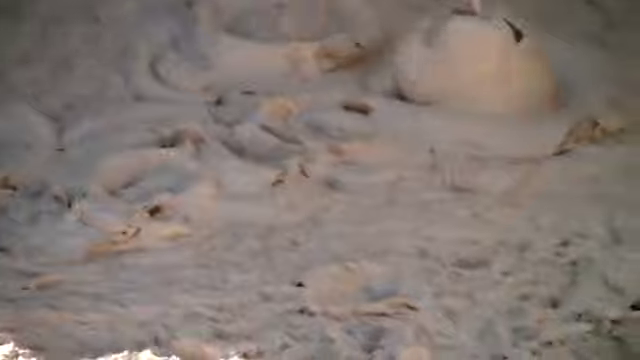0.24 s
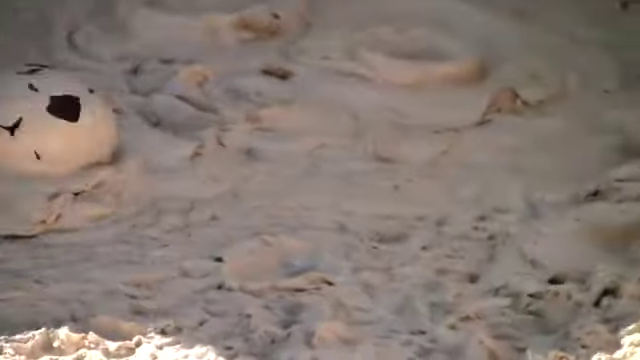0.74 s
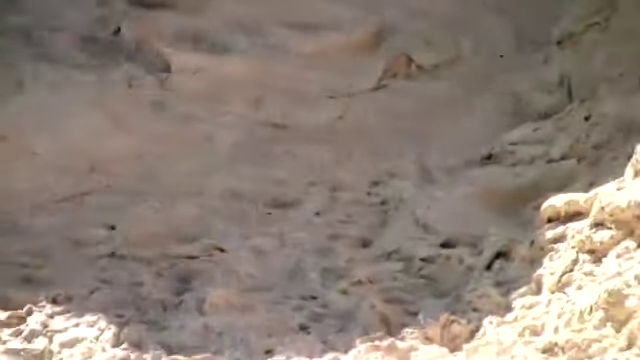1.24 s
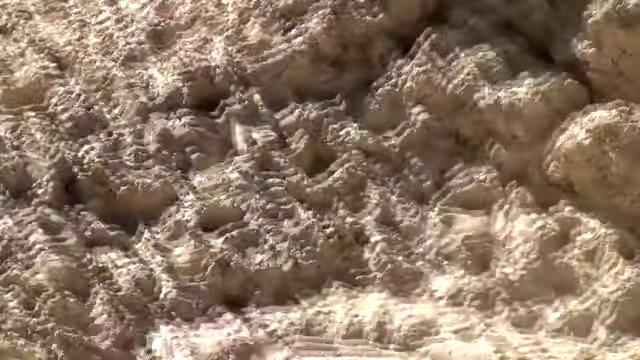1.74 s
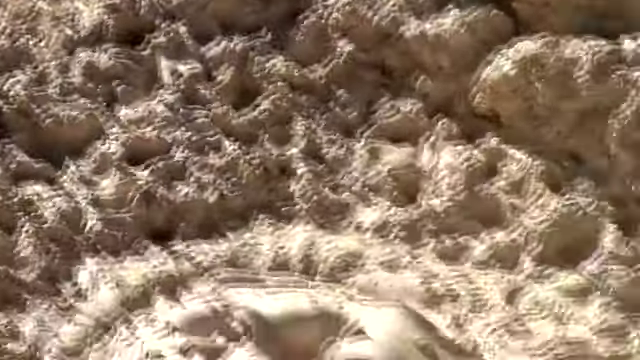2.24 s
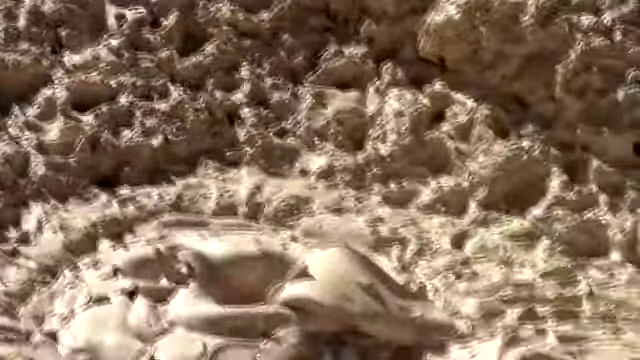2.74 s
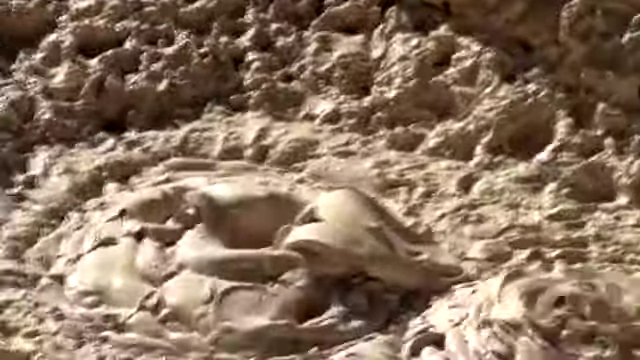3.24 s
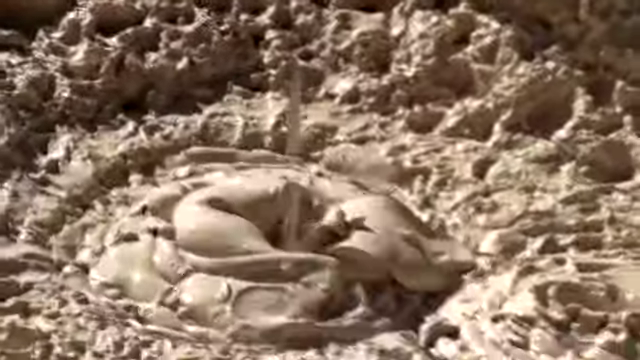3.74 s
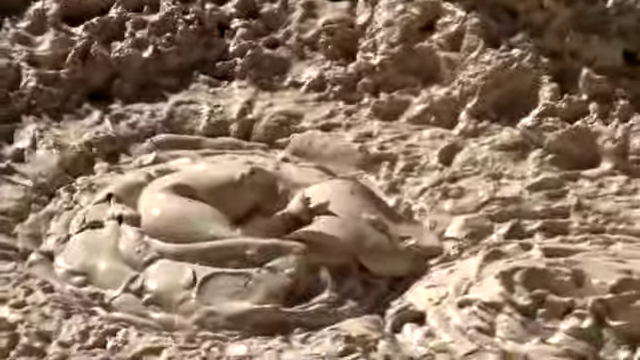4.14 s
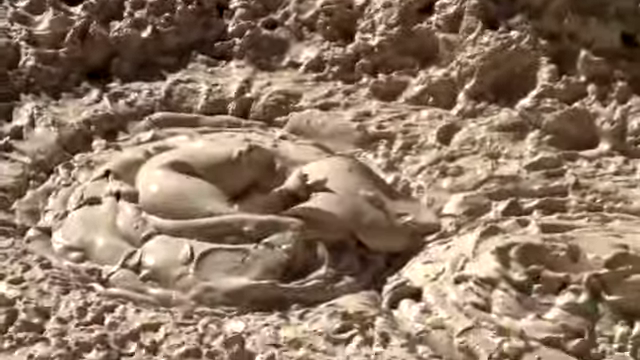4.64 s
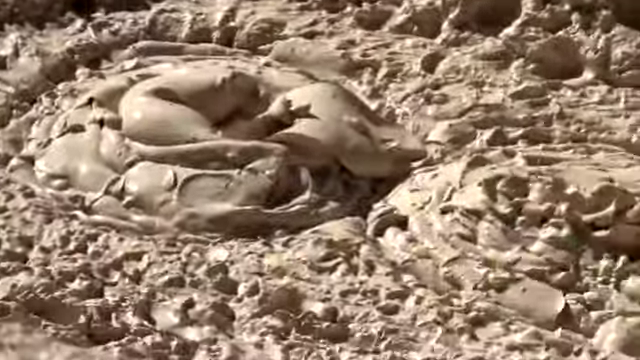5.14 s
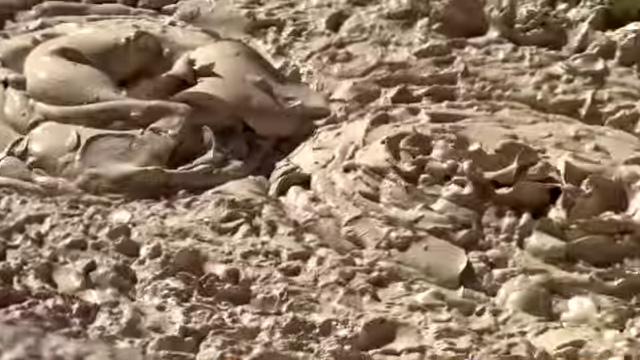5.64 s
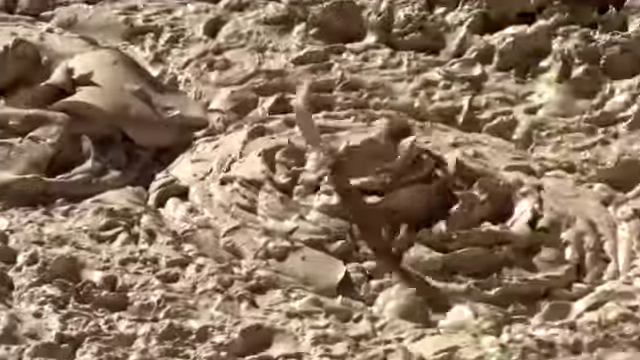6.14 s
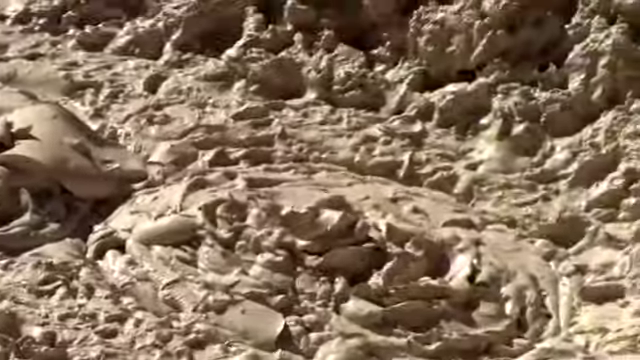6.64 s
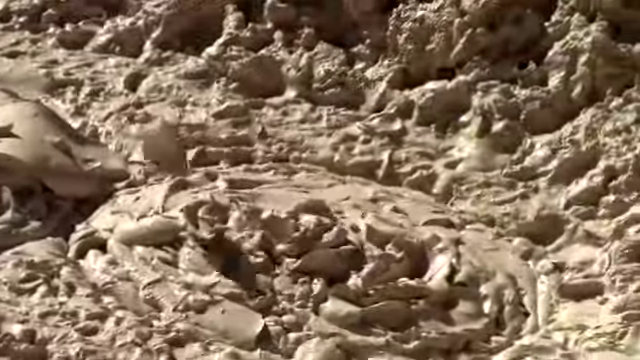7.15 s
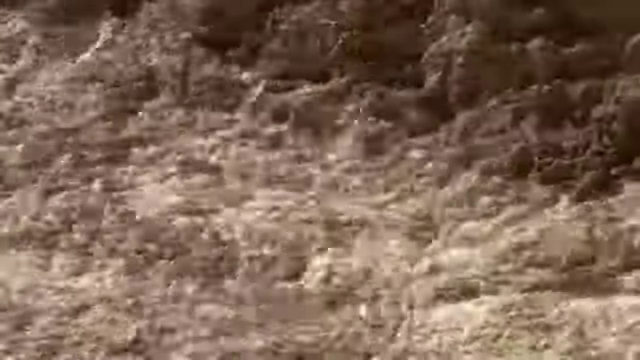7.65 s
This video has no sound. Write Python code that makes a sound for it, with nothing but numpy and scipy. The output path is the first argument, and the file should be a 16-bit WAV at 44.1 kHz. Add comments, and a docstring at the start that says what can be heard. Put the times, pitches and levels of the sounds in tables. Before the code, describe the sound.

A mud pot boils steadily, heard in stereo from its edge. Mid-low glugs and blunt pops come several per second, some single, some tumbling together, with occasional higher blips. Sticky slaps, crackly ticks and faint spits of steam accompany them, while heavy mud sloshes low. Between bursts only a quiet, soft simmering wash remains. Outdoors, close, with tight short reflections from the pit.

```python
"""Gas bubbles swell and burst in a pit of thick hot mud, heard in stereo from the rim. Each cavity rings for a
few gliding cycles, a swelling sine wave; where the skin breaks, it slaps and snaps. Steam is noise that hisses
out of the torn skin; froth (many tiny cavities) and slosh follow the churning. Farther pots simmer under it all
as a soft wash of noise, an even hiss lies over the treble, and the pit walls give the bursts a short echo."""
import sys
import numpy as np
from scipy import signal
from scipy.fft import rfft, irfft
from scipy.io import wavfile
from scipy.ndimage import uniform_filter1d

SR = 44100
rng = np.random.default_rng(int(sys.argv[2]) if len(sys.argv) > 2 else 0)


def to_wav(sig):
    """Store sig (one row per channel, or 1-D mono) as 16-bit WAV at the path in sys.argv[1].

    Samples outside -1..1 are clipped; the rate is SR.
    """
    pcm = np.clip(np.atleast_2d(sig), -1, 1) * 32767
    pcm = np.round(pcm).astype(np.int16)
    wavfile.write(sys.argv[1], SR, pcm.T)  # frames by channels


N = 348390  # length in samples


def gain_of(db):
    """Turns decibels into a factor for the wave."""
    return 10 ** (np.asarray(db) / 20)


def evened(x):
    """Brings a sound to an average (RMS) strength of 1."""
    return x / np.sqrt(np.mean(x ** 2) + 1e-20)


def read(points, hz):
    """Reads a curve between its points, with frequency on a log scale as in hearing."""
    f, value = np.transpose(points)
    return np.interp(np.log(hz + 1), np.log(f + 1), value)


def add(mix, start_s, sound):
    """Lays a sound into the mix at its start time."""
    part = mix[max(round(start_s * SR), 0):][:len(sound)]
    part += sound[:len(part)]


def shaped(x, points):
    """Colours a sound by a spectrum in dB."""
    hz = np.fft.rfftfreq(N, 1 / SR)
    return irfft(rfft(x) * gain_of(read(points, hz)), N)


def filtered(x, order, hz, kind):
    """Keeps the part of a sound above, below or between the given frequencies."""
    return signal.sosfilt(signal.butter(order, hz, kind, fs=SR, output="sos"), x)


def cavity(hz, rise_s, glide, phase, quiver=(0, 0)):
    """A gas cavity swells and dies in a few cycles; its pitch glides as it opens and wavers as the walls quiver."""
    t = np.arange(round(7 * abs(rise_s) * SR) + 2) / SR
    u = t / abs(rise_s)  # time counted in rise times: loudest at 1
    phase = phase + np.interp(t / .007, np.arange(len(quiver)), np.cumsum(quiver))  # a new nudge every 7 ms
    swell = (u * np.exp(1 - u)) ** 1.39
    turns = hz * t * (1 + glide * (u / 2 - 1)) + phase  # passes through hz at the loudest moment
    return swell * np.sin(2 * np.pi * turns)


# The large bubbles. Each row: start in seconds, pitch in Hz, relative peak level in dB, rise time in ms.
LARGE_BUBBLES = [(.0044, 312, -29, 13.3), (0.046, 238, -15.5, 4), (.0697, 652, -29, 21.7),
                 (.088, 615, -19, 2), (0.1037, 590, -8.5, 2.3), (.288, 267, -16.5, 3.3),
                 (.336, 1343, -14, 6.5), (.3468, 502, -13.5, 6.6), (0.362, 550, -6.5, 2),
                 (.514, 513, -30, 31), (0.5511, 603, -11, 2), (.5635, 670, -6.5, 1.46),
                 (0.8475, 272, -13.5, 6.5), (.9056, 480, -15.5, 6.7), (0.9081, 1535, -18.5, 2.5),
                 (0.9686, 510, -8.5, 2.6), (0.9866, 313, -14, 7.5), (.9883, 520, -16, 3),
                 (1.0786, 510, -17, 6.2), (1.0947, 670, -14.5, 3.4), (1.205, 326, -33, 4),
                 (1.293, 282, -30, 4), (1.364, 223, -24.5, 5.9), (1.3915, 262, -24, 5.8),
                 (1.4245, 500, -22, 13), (1.4498, 503, -10, 2.8), (1.4712, 239, -16.5, 8.4),
                 (1.4798, 1243, -20, 8.7), (1.4894, 328, -11, 2), (1.5253, 454, -21.5, 12),
                 (1.5264, 1400, -20, 1.7), (1.5438, 1360, -20, 1.7), (1.5492, 740, -17.5, 2.6),
                 (1.755, 264, -16, 3.2), (1.773, 485, -8, 1.34), (1.791, 730, -17.5, 4.4),
                 (1.8193, 450, -13.5, 1.3), (1.8277, 790, -15, 1.2), (2.006, 262, -17, 9.3),
                 (2.0298, 570, -7, 1.05), (2.036, 554, -6, 1.6), (2.0438, 480, -14.5, 11.7),
                 (2.0477, 746, -15, 6.4), (2.0788, 1430, -15, 0.89), (2.0955, 1240, -20.5, 3.4),
                 (2.103, 336, -16.5, 10.2), (2.1388, 488, -23, 10.6), (2.1566, 644, -10, 1.8),
                 (2.4107, 263, -21, 3.1), (2.504, 260, -26.5, 4), (2.516, 526, -19, 9.7),
                 (2.5527, 710, -13.5, 5), (2.6126, 240, -17.5, 8), (2.615, 505, -9, 0.69),
                 (2.679, 1550, -15.5, 2), (2.6819, 478, -21, 5.4), (2.846, 473, -28, 4),
                 (2.862, 525, -20, 5), (2.878, 595, -17.5, 4.2), (3.105, 437, -35.5, 15),
                 (3.1602, 486, -31, 26), (3.1945, 534, -14, 1.8), (3.2088, 590, -18.5, 2.7),
                 (3.2884, 344, -21.5, 11.3), (3.3217, 1230, -18.5, 2.2), (3.4174, 350, -17, 4.5),
                 (3.4524, 754, -18, 7), (3.5134, 302, -23, 9.8), (3.5251, 499, -11.5, 2.8),
                 (3.5391, 480, -19, 3.2), (3.5462, 608, -9.5, 2.1), (3.6316, 227, -23.6, 1.6),
                 (3.847, 298, -24.5, 2.8), (3.866, 421, -25.5, 7), (3.9, 498, -14, 4.2),
                 (3.925, 470, -16.5, 4), (3.9381, 243, -14, 4.4), (4.0115, 499, -16.5, 9.8),
                 (4.0277, 1400, -15, 0.77), (4.1662, 248, -19, 3.9), (4.198, 497, -18, 8.2),
                 (4.2201, 625, -15, 3.2), (4.2328, 400, -9.5, 1.3), (4.2468, 335, -11.5, 1.8),
                 (4.262, 297, -16, 2.1), (4.278, 335, -22.5, 11), (4.3197, 515, -18.5, 5.2),
                 (4.359, 343, -30, 7.1), (4.5782, 221, -19.5, 8.4), (4.584, 1234, -21.5, 6),
                 (4.595, 300, -18.5, 2.9), (4.6484, 480, -9, 7.3), (4.6469, 1566, -22.5, 2.3),
                 (4.7791, 498, -20.5, 6), (4.8138, 560, -13, 1.47), (4.826, 605, -14.5, 2.5),
                 (5.062, 318, -24, 4), (5.061, 1550, -33, 3.3), (5.156, 240, -19, 3.5),
                 (5.172, 292, -26.5, 4.2), (5.1924, 1360, -24, 4.5), (5.199, 332, -20.5, 3),
                 (5.222, 488, -26.5, 5.5), (5.2196, 1330, -16, 0.97), (5.2881, 495, -16, 1.06),
                 (5.298, 953, -25.5, 4), (5.367, 198, -34.5, 5.5), (5.425, 146, -31, 7.3),
                 (5.6671, 331.6, -22, 21.6), (5.6861, 506, -16, 7.2), (5.7192, 537, -6.5, 1.04),
                 (5.7266, 643, -15, 4.5), (5.7462, 715, -17.5, 1.55), (5.811, 264.6, -27, 8.2),
                 (5.9837, 229, -24.5, 5.6), (6.032, 380, -27, 4), (6.0539, 442.3, -19.5, 16.7),
                 (6.0774, 1263, -15.5, 3.6), (6.085, 588, -17.5, 3.8), (6.1445, 263, -24.5, 8.5),
                 (6.164, 457, -20.5, 12.5), (6.1939, 640, -14.5, 2.4), (6.2342, 396, -31, 4.6),
                 (6.41, 255, -37, 5.5), (6.515, 250, -27.5, 14), (6.5326, 431, -13, 10),
                 (6.5629, 283, -11, 5), (6.5785, 742, -20, 14.4), (6.605, 752, -10.5, 2.6),
                 (6.6281, 510, -10, 1.8), (6.633, 1304, -21, 3.2), (6.6837, 720, -20, 1.8),
                 (6.7623, 242, -31.5, 8.9), (6.884, 260, -38.5, 11.4), (6.915, 247, -33.5, 6.6),
                 (7.021, 290, -33, 6.2), (7.048, 265, -22.5, 19), (7.0843, 540, -4.5, 1.9),
                 (7.102, 664, -7.5, 2.1), (7.1267, 912, -10, 3.2), (7.1548, 380, -14, 2.5),
                 (7.1618, 456, -16.5, 6.1), (7.1807, 314, -18.5, 5.9), (7.2061, 440, -16.5, 2.7),
                 (7.2358, 309, -26, 30), (7.2475, 562, -16, 8.9), (7.2585, 730, -14.5, 8.2),
                 (7.278, 1003, -15.5, 4.9), (7.3, 1025, -17.5, 1.3), (7.3334, 247, -18, 2.2),
                 (7.3672, 468, -26, 8.1), (7.402, 351, -29.5, 14.2), (7.4456, 662, -20, 2.6),
                 (7.615, 283, -30, 13), (7.6816, 459, -19, 5), (7.7093, 267, -20.5, 5.4),
                 (7.835, 518, -19, 5), (7.8554, 290, -13.5, 2.4)]
# How far the pitch glides. Each row: bubble pitch in Hz, glide per rise time as a share of the pitch.
PITCH_GLIDE = [(200, 0.043), (350, 0.18), (500, 0.0043), (800, 0.052), (3000, 0.0066)]
# The neck of a bubble rings higher and shorter: pitch ratio, its spread, level in dB, share of the rise time.
NECK_RATIO, NECK_SPREAD, NECK_DB, NECK_SHARE = 2.4, 0.29, -22.5, 0.69


def bubbles(quiver_turns=.13):
    """The large bubbles, one cavity and neck each; a long ring in soft mud wavers and breaks up."""
    out = np.zeros(N)
    chance = rng.standard_normal((len(LARGE_BUBBLES), 26))
    for (start_s, hz, db, rise_ms), (phase, wide, *nudges) in zip(LARGE_BUBBLES, chance):
        rise_s = rise_ms / 1000
        quiver = quiver_turns * np.sqrt(max(hz / 500, 1)) * np.array(nudges)  # thin small walls quiver more
        body = cavity(hz, rise_s, read(PITCH_GLIDE, hz), phase, quiver)
        add(out, start_s, gain_of(db) * body)
        neck_hz = hz * (NECK_RATIO + NECK_SPREAD * wide)
        neck = cavity(neck_hz, NECK_SHARE * rise_s, 0, phase, 2 * quiver)
        add(out, start_s, gain_of(db + NECK_DB) * neck)
    return out


# Where the mud skin breaks. Each row: start in seconds, relative level of the dull slap in dB,
# relative level of the bright snap in dB.
SKIN_BREAKS = [(0.287, -31, -44), (.849, -25, -49), (0.9103, -17, -44), (.969, -31, -55),
               (1.2975, -41, -30.5), (1.698, -55, -33), (2.007, -24, -54), (2.0491, -8.5, -17),
               (2.155, -13.5, -49), (2.409, -50, -60), (2.68, -15, -37), (2.8939, -20.5, -29),
               (3.261, -20.5, -34), (3.3217, -15, -48), (3.419, -24, -55), (3.4546, -11, -17.5),
               (4.2231, -13, -26.5), (4.0269, -20.5, -42), (4.578, -15, -35), (4.782, -25, -49),
               (5.0618, -21.5, -57), (5.118, -37, -49), (5.156, -17.5, -38), (5.2188, -13.5, -50),
               (5.747, -29, -42), (5.9853, -24.5, -33), (6.607, -26, -48), (6.764, -39, -62),
               (6.9544, -50, -33.5), (7.0673, -31, -34), (7.131, -10, -42), (7.202, -18, -37),
               (7.3, -12, -54), (7.614, -20, -61), (7.686, -21.5, -41)]


def slaps(decay_s=0.0079, level_db=-5.5):
    """A sudden push of air, then a short wet rattle of fading noise."""
    out, t = np.zeros(N), np.arange(800) / SR
    u = t / 0.0016
    push = 3 * (1 - u) * np.exp(-u)
    for (start_s, db, _), noise in zip(SKIN_BREAKS, rng.standard_normal((len(SKIN_BREAKS), 800))):
        rattle = noise * np.exp(-t / decay_s)
        add(out, start_s, gain_of(db + level_db) * (push + rattle))
    return filtered(out, 2, [300, 2400], "band")


def snaps(decay_s=0.0036, level_db=-2.0):
    """Short bright ticks of fading noise as the skin tears, nearly alike at both ears."""
    out, t = np.zeros((N, 2)), np.arange(400)[:, None] / SR
    for (start_s, _, db), noise in zip(SKIN_BREAKS, rng.standard_normal((len(SKIN_BREAKS), 400, 3))):
        tick = noise[:, :1] + 0.22 * noise[:, 1:]  # shared noise, plus a little of each ear's own
        add(out, start_s, gain_of(db + level_db) * tick * np.exp(-t / decay_s))
    return filtered(out.T, 1, [1500, 8000], "band")


def churning(large, linger_s, power=0.82):
    """How stirred the mud is: follows the large bubbles and lingers after them."""
    keep = np.exp(-1 / (linger_s * SR))
    smooth = uniform_filter1d(large ** 2, size=500)
    energy = signal.lfilter([1 - keep], [1, -keep], smooth)
    return abs(energy) ** (power / 2)


# Colour of the froth. Each row: cavity pitch in Hz, relative level in dB.
FROTH_COLOUR = [(90, -30.5), (160, -6), (280, 3.5), (390, 2), (500, 3.5), (800, -3.5), (1300, -22),
                (2200, -20.5), (4000, -33)]


def froth(colour, per_s, spread_db, cycles, count=20):
    """Very many small cavities at random times, of many pitches and uneven loudness."""
    loudness = gain_of(spread_db * np.minimum(rng.exponential(1, N), 4))
    size = loudness * (rng.random(N) < per_s / SR)
    kind, out = rng.integers(0, count, N), np.zeros(N)
    for k, hz in enumerate(np.geomspace(colour[0][0], colour[-1][0], count)):
        rise_s = cycles * rng.uniform(0.75, 1.45) / hz
        grain = cavity(hz, rise_s, rng.uniform(-0.055, 0.069), rng.random())
        grain = grain / np.linalg.norm(grain)
        out += gain_of(read(colour, hz)) * signal.oaconvolve(size * (kind == k), grain)[:N]
    return evened(out)


def vent(x, shifting_db):
    """The ragged hole changes shape: resonances a few hundred Hz wide come and go within tens of ms."""
    z = signal.stft(x, nperseg=512, noverlap=384)[2]
    field = rng.standard_normal(z.shape[:0:-1]).T  # one chance value per frequency and moment
    for moments in (15, 8):
        field = uniform_filter1d(uniform_filter1d(field, size=3, axis=0), size=moments, axis=1)
    fade = np.clip(np.linspace(1.6, -1, len(field)), .25, 1)[:, None]  # weaker in the top band
    z = z * gain_of(shifting_db * fade * evened(field))
    return signal.istft(z, nperseg=512, noverlap=384)[1][:, :N]


# Steam vents. Each row: start in seconds, length in seconds, relative level in dB,
# swell in dB by the end, extra level of the top band in dB.
STEAM_PUFFS = [(0.075, 0.043, -47, 11.5, -3), (0.294, 0.062, -38, 4.5, 11.5), (0.464, 0.016, -57, -6, 15),
               (0.535, 0.046, -43, -2, 5), (0.623, .008, -59.5, 3, 22.5), (0.856, 0.063, -35, 0.5, 9.5),
               (0.943, 0.045, -45, 6, 0), (1.071, 0.054, -39, -6, -5), (1.203, 0.05, -48, -6, 8),
               (1.296, 0.022, -38.5, -4, 2), (1.41, 0.031, -42, 1.5, 3.5), (1.469, 0.089, -37, 5, 6),
               (1.59, 0.061, -57.5, 0, 23), (1.778, 0.067, -46.5, 8.5, 3.5), (1.907, 0.027, -41.5, 0, -10),
               (2.008, .152, -43, 8, 5), (2.515, 0.045, -47, 9, 1), (2.591, 0.094, -38.5, -0.5, 5.5),
               (2.857, 0.047, -46, 14.5, 5.5), (3.173, 0.038, -50.5, 5.5, 9), (3.268, 0.053, -36.5, -3, 4),
               (3.427, 0.03, -47.5, 16, 6.5), (3.505, 0.04, -48.5, 5, -3), (3.611, 0.037, -55, 0, 16),
               (3.866, 0.045, -52, -3, 3), (3.931, 0.084, -48.5, 5, 13), (4.001, 0.032, -41.5, 3, 8),
               (4.189, 0.1, -45.5, 2, 3.5), (4.311, 0.021, -40.5, 2, -11), (4.389, 0.013, -43.5, 5, -1),
               (4.54, 0.013, -52, -2, 5), (4.587, 0.063, -42.5, 10, 7), (4.804, 0.032, -45.5, 12, -7),
               (5.119, 0.0058, -35.5, -3.5, 6), (5.164, 0.045, -39.5, -0.5, 11),
               (5.266, 0.031, -44, 7, 4.5), (5.423, 0.028, -61.5, 9.5, 9), (5.52, .01, -58, -2, 7),
               (5.64, 0.01, -46.5, -2, 15), (5.675, 0.08, -48, 5.5, 1), (5.988, .11, -41, 2, 11.5),
               (6.147, 0.049, -47.5, 3.5, -1), (6.39, 0.033, -58, -2, 2), (6.516, 0.12, -44, 9.5, 6),
               (6.669, 0.038, -45, -1, 7), (6.919, 0.037, -45, -15, 18.5), (7.063, 0.067, -41.5, 7, 6),
               (7.207, 0.022, -38, -1.5, 1), (7.247, 0.063, -42, -6, 2), (7.319, 0.026, -42, -2.5, -1),
               (7.36, 0.045, -44.5, 7, 4), (7.442, 0.015, -44, 4.5, 2), (7.595, 0.089, -45.5, 11.5, 10),
               (7.813, 0.03, -43.5, 2, -1)]
# Colour of the hiss before the vent reshapes it. Each row: frequency in Hz, relative strength in dB per Hz.
STEAM_COLOUR = [(500, 2.5), (1200, 8), (2200, 2.5), (3500, -4), (6000, -11.5), (7300, -16.5), (9500, -16.5),
                (13000, -24.5), (16000, -25)]
# Colour of the wet pockets in the jet. Each row: pitch in Hz, relative level in dB.
GURGLE_COLOUR = [(900, 2), (1400, 8.5), (2200, -67), (3200, -2), (6000, -32)]
OPEN_MS, SHUT_MS = 2.7, 7.85  # the level is 6.2 dB down this long before a puff starts or after it ends
# The jet spurts as bubbles burst: power of the churning, its calm and usual level in dB.
SPURT, CALM_DB, USUAL_DB = 0.32, -39, -22


def steam(large, edge=0.93, split_hz=6500, wide_db=-3., gurgle_db=-0.5):
    """Hiss through the torn skin, and wet pockets that gurgle in the jet; brighter puffs carry more of the top band."""
    t = np.arange(N) / SR
    energy = np.zeros((2, N))  # of the body and of the top band
    for start_s, length_s, db, swell_db, bright_db in STEAM_PUFFS:
        near = slice(max(round((start_s - .1) * SR), 0), round((start_s + length_s + .1) * SR))
        since = t[near] - start_s
        before_s, after_s = np.maximum(-since, 0), np.maximum(since - length_s, 0)
        away = 1000 * (before_s / OPEN_MS + after_s / SHUT_MS)
        db = db + swell_db * np.clip(since / length_s, 0, 1) ** 2
        energy[:, near] += gain_of(db - 6.2 * away ** edge + np.array([[0], [bright_db]])) ** 2
    stirred = gain_of(2 * CALM_DB) + churning(large, linger_s=0.0016, power=2.02)
    energy *= (stirred / gain_of(2 * USUAL_DB)) ** SPURT

    # droplets break up the jet
    spit = gain_of(2.6 * evened(uniform_filter1d(rng.standard_normal(N), size=90)))
    apart = filtered(rng.standard_normal((2, N)), 2, 5000, "high")
    jet = rng.standard_normal(N) + gain_of(wide_db) * apart  # short waves reach the two ears differently
    jet = evened(vent(shaped(jet * spit, STEAM_COLOUR), shifting_db=4.5))
    top = signal.sosfiltfilt(signal.butter(2, split_hz, "high", fs=SR, output="sos"), jet)
    gurgle = froth(GURGLE_COLOUR, per_s=400, spread_db=-1.0, cycles=4.5)
    body = gain_of(5.5) * (jet - top) + gain_of(gurgle_db) * gurgle
    return body * np.sqrt(energy[0]) + gain_of(2.0) * top * np.sqrt(energy[1])


# Colour of the slosh. Each row: frequency in Hz, relative strength in dB per Hz.
SLOSH_COLOUR = [(20, -82), (50, -62), (100, -1), (170, -5.5), (260, 9.5), (400, -42)]


def slosh():
    """Heavy mud heaves and falls back across the pit: low noise, nearly alike at both ears."""
    noise = rng.standard_normal(N) + 0.15 * rng.standard_normal((2, N))
    return evened(shaped(noise, SLOSH_COLOUR))


def pit(x, t60=0.098, first_s=0.0042):
    """Sparse echoes off the mud walls, different at each ear; they fade by 60 dB in t60 seconds."""
    at = np.arange(0, 8000, 20) + rng.integers(0, 20, (2, 400))  # one echo at random in every 20 samples
    taps = np.zeros((2, 8020))
    np.put_along_axis(taps, at, rng.choice([-1., 1.], at.shape), 1)
    late = np.arange(8020)
    taps *= gain_of(-60 * late / SR / t60) * (late > first_s * SR)
    return signal.oaconvolve(x[None], taps / np.linalg.norm(taps[0]), axes=1)[:, :N]


# Colour of the wash. Each row: frequency in Hz, relative strength in dB per Hz.
SIMMER_COLOUR = [(15, -56), (25, -35), (134, 1.5), (293, -7.5), (641, -9.5), (936, -10.5), (1100, -14.5),
                 (2160, -22), (13600, -34.5), (16000, -38)]
# How alike left and right are in the wash. Each row: frequency in Hz, likeness from 0 to 1.
LIKENESS = [(60, 1), (1000, 0.1), (3000, 0.43), (7000, 0.067)]
# How much the wash drifts. Each row: frequency in Hz, typical drift in dB.
DRIFT = [(100, 3.), (1000, 2.5), (3000, 1.2), (6000, .5)]
SIMMER_DB = -47.5  # level of the wash; the plops ride on top


def simmer(plops_db=-4.):
    """A wash from farther pots that drifts in the low bands, with faint plops in it; an evener hiss lies on
    top."""
    frames, hz = N // 128 + 5, np.fft.rfftfreq(512, 1 / SR)
    a, b, c, d, patches = rng.standard_normal((frames, 257, 5)).T
    patches = evened(uniform_filter1d(uniform_filter1d(patches, size=14, axis=0), size=10, axis=1))
    same = np.clip(read(LIKENESS, hz), -1, 1)[:, None]
    left = a + 1j * b
    right = same * left + np.sqrt(1 - same ** 2) * (c + 1j * d)
    z = np.array([left, right]) * gain_of(read(DRIFT, hz)[:, None] * patches)
    wash = signal.istft(z, nperseg=512, noverlap=384)[1][:, :N]
    wash = evened(shaped(wash, SIMMER_COLOUR))
    plops = gain_of(plops_db) * froth(FROTH_COLOUR, per_s=220, spread_db=3.2, cycles=2.2)
    return gain_of(SIMMER_DB) * (wash + plops)


def scene():
    """Mixes the bursting bubbles with their echo, the heaving mud, the steam and the simmer."""
    large = bubbles()
    stirred = churning(large, linger_s=0.0048)
    small = gain_of(-9.0) * stirred * froth(FROTH_COLOUR, per_s=800, spread_db=3.5, cycles=1.46)
    pops = gain_of(-0.3) * large + small + slaps()
    pops = filtered(pops, 2, 90, "high")  # small openings radiate no deep bass
    echo = pit(pops)
    echo = gain_of(-13.5) * (echo + .5 * echo[::-1])  # each ear also hears half of the other's echo
    biggest = filtered(large, 2, 380, "low")  # the deep bubbles move the most mud
    heave = gain_of(-23.0) * churning(biggest, linger_s=0.0048, power=0.51) * slosh()
    heave = filtered(heave, 2, 60, "high")
    return pops + echo + heave + snaps() + steam(large) + simmer()


# Balance of the two microphones. Each row: frequency in Hz, left over right in dB.
LEFT_OVER_RIGHT = [(60, 1.5), (240, -1.5), (950, -2), (3770, 0), (8000, -2.5), (14000, 1)]
EDGE_HZ = 15900  # upper band limit


def record(dry, low_cut_hz=45):
    """The two microphones differ a little in colour and drop the deepest bass; then the band limit."""
    tilt = read(LEFT_OVER_RIGHT, np.fft.rfftfreq(N, 1 / SR)) / 2
    pair = irfft(rfft(dry) * gain_of([tilt, -tilt]), N)
    pair = filtered(pair, 2, low_cut_hz, "high")
    band_limit = signal.firwin(511, EDGE_HZ, window=("kaiser", 9), fs=SR)
    return signal.oaconvolve(pair, band_limit[None], "same")


dry = scene()
out = record(dry)
to_wav(out)
```